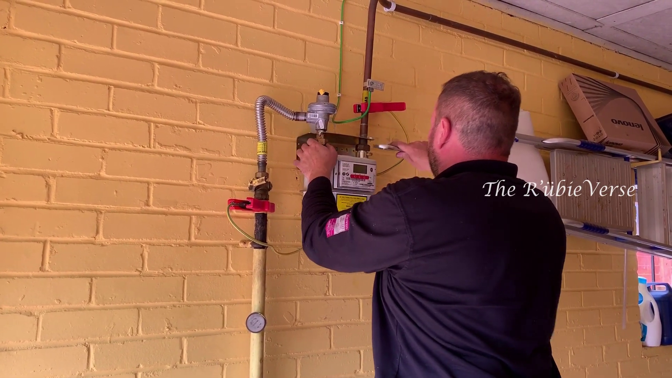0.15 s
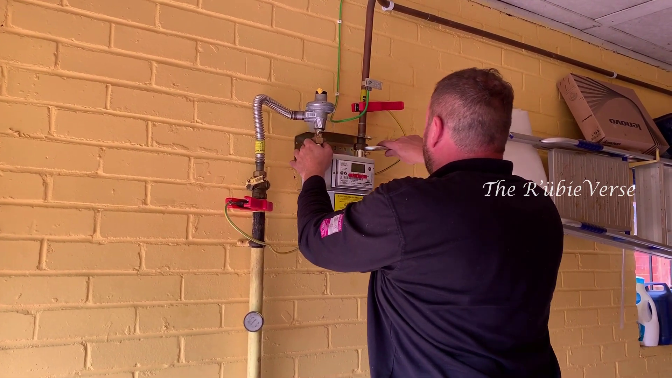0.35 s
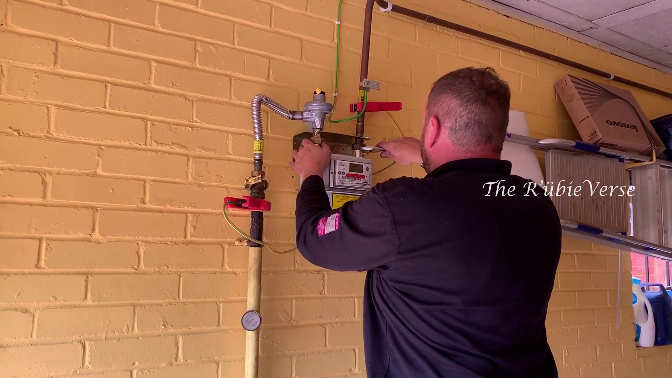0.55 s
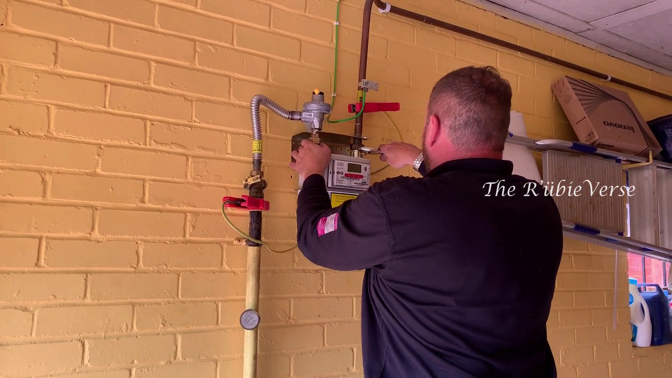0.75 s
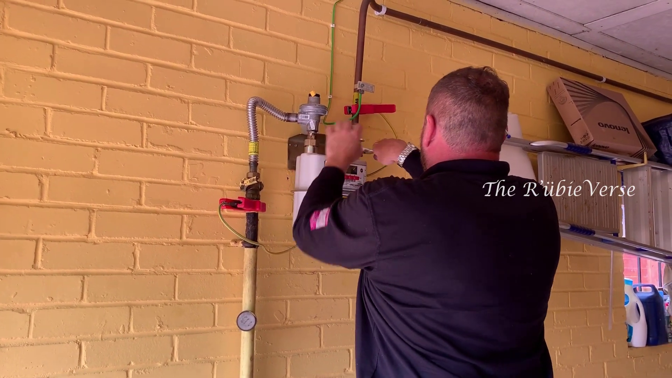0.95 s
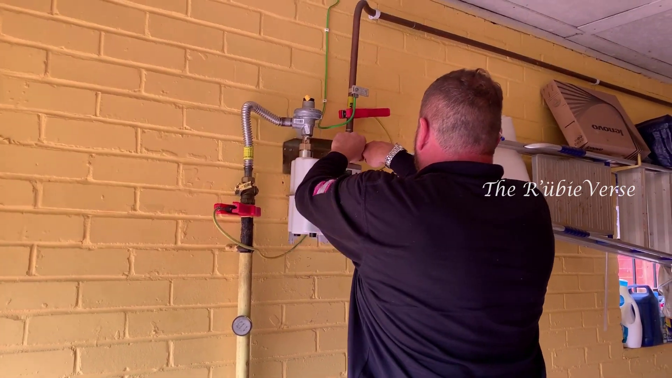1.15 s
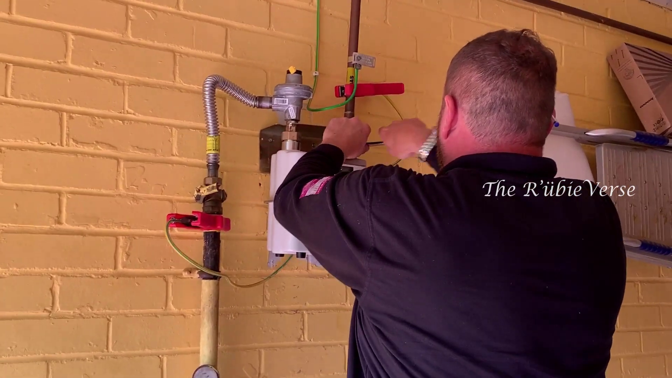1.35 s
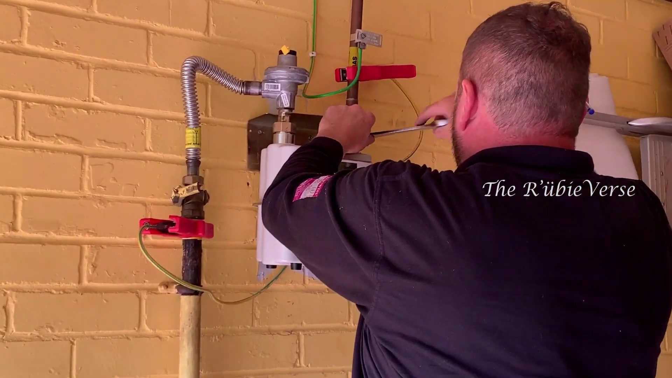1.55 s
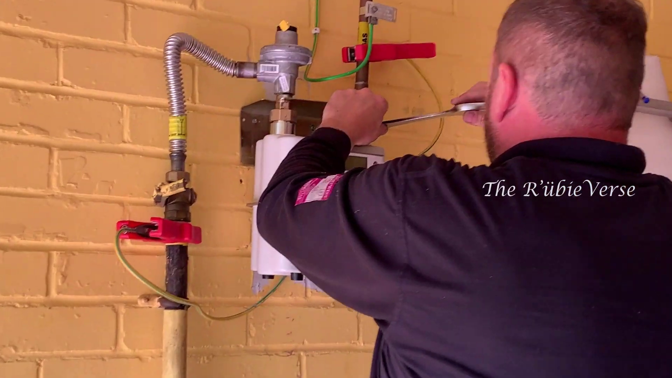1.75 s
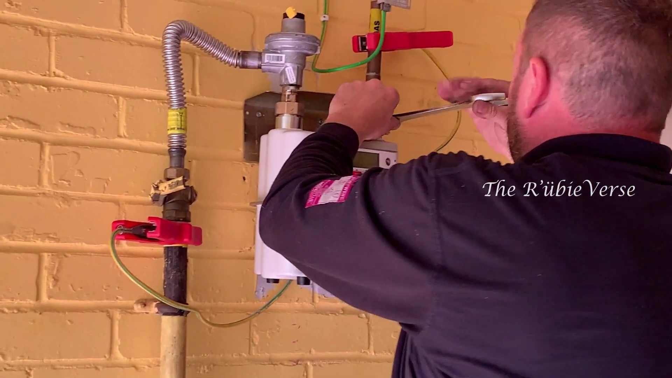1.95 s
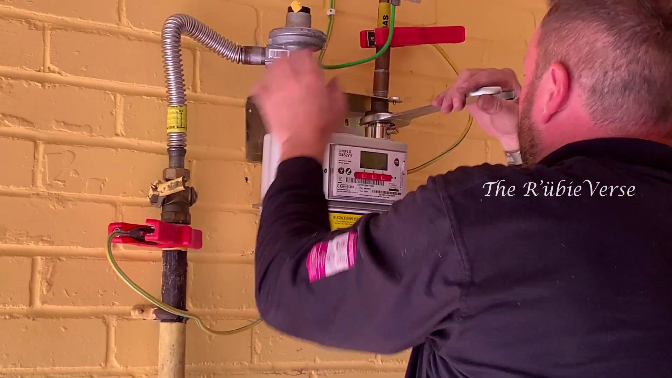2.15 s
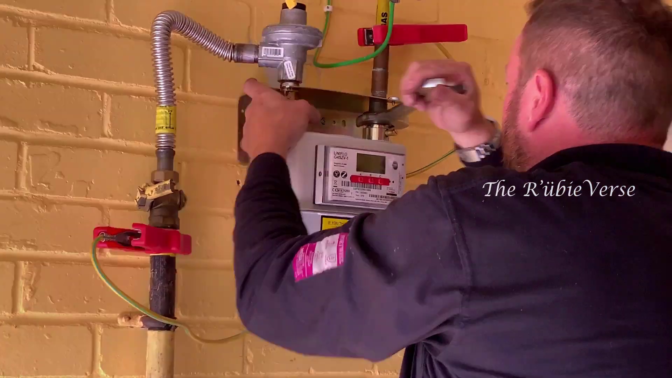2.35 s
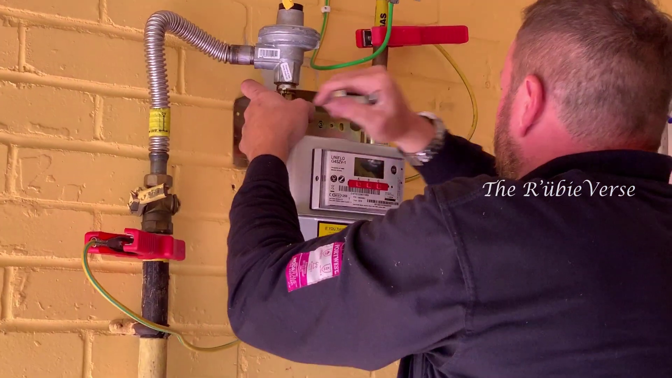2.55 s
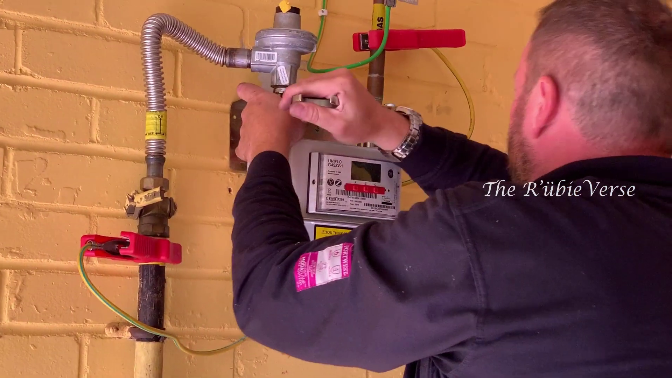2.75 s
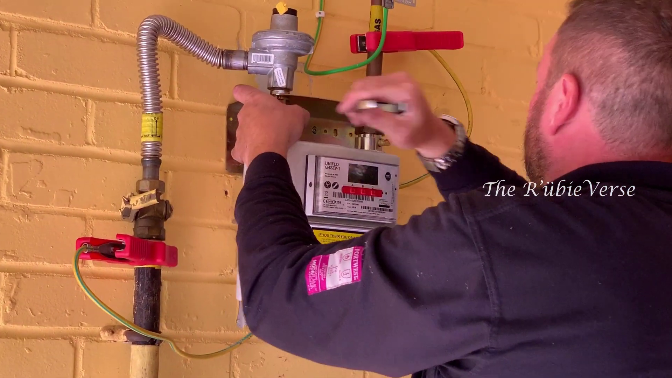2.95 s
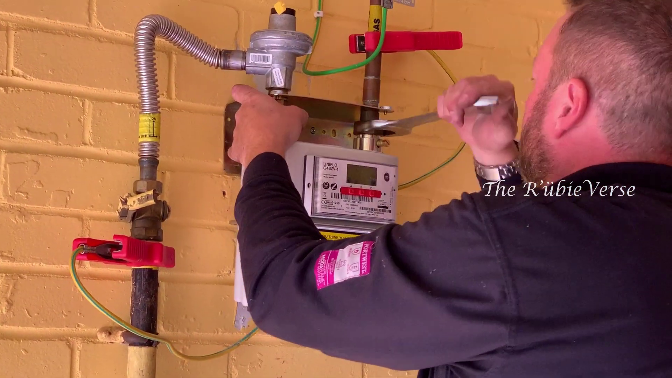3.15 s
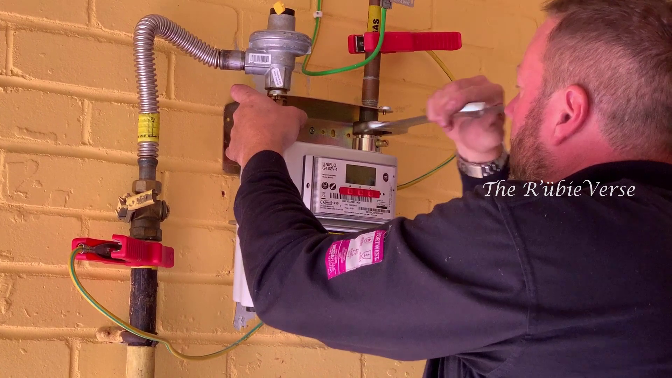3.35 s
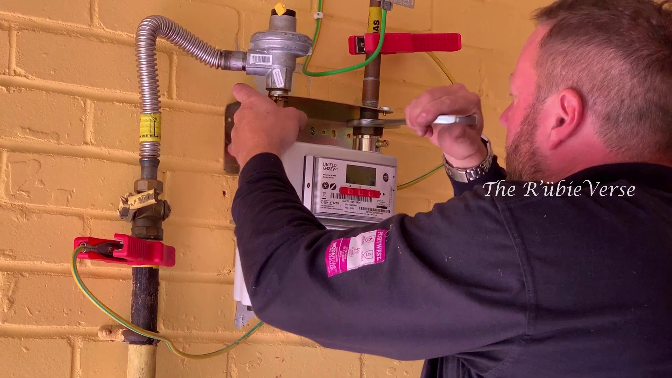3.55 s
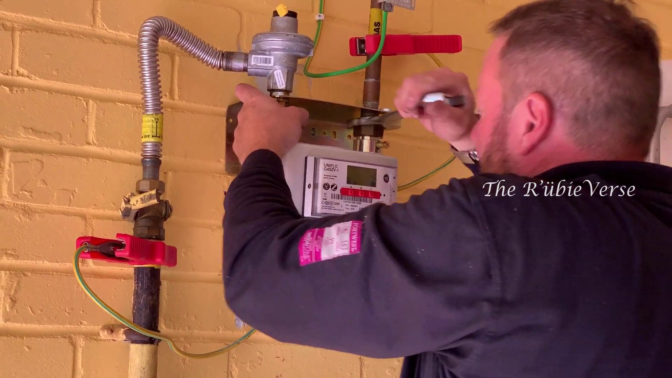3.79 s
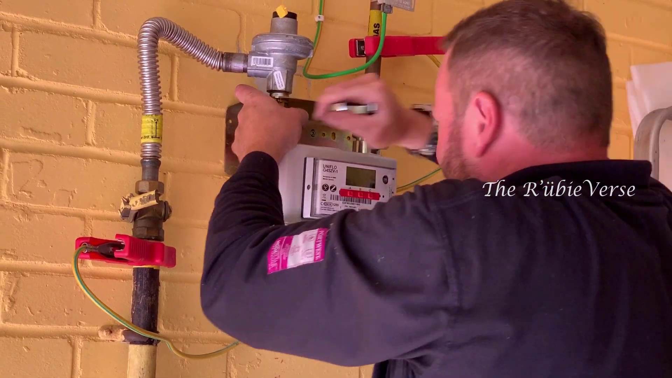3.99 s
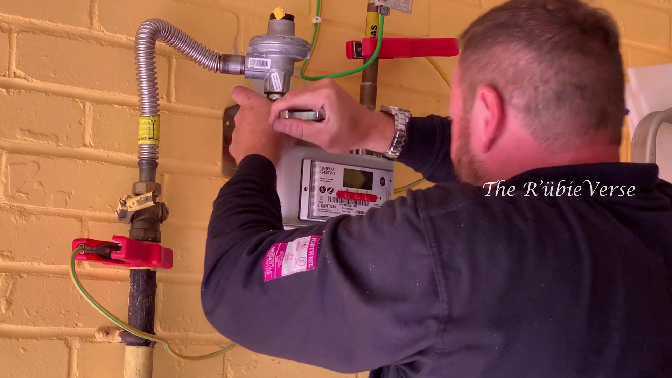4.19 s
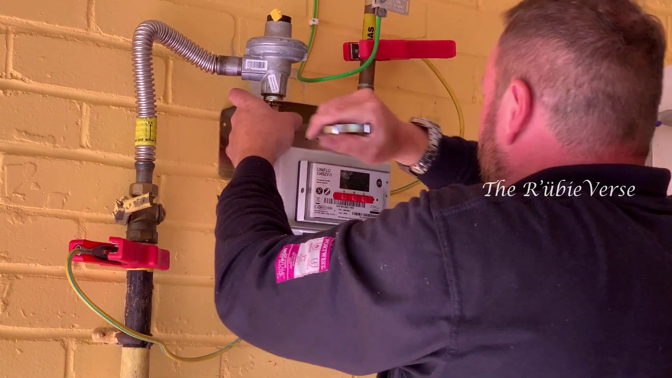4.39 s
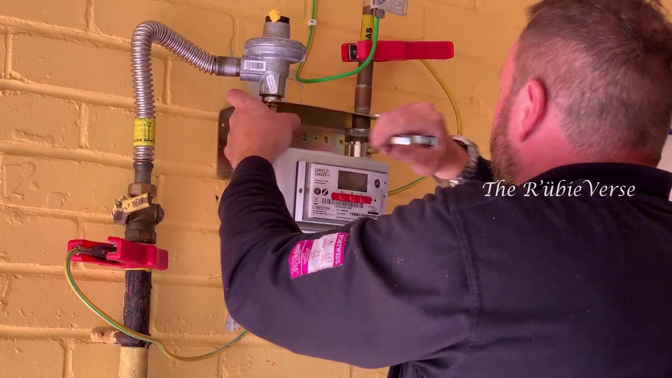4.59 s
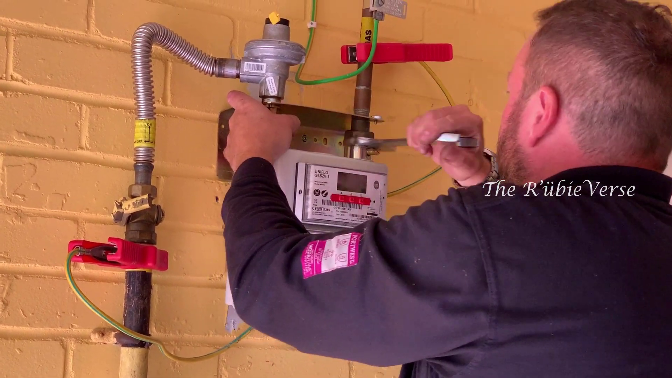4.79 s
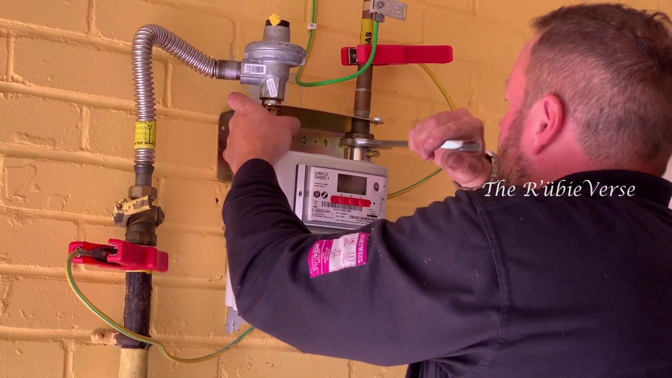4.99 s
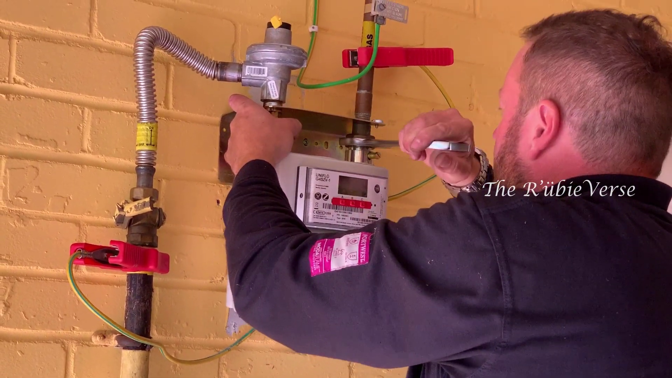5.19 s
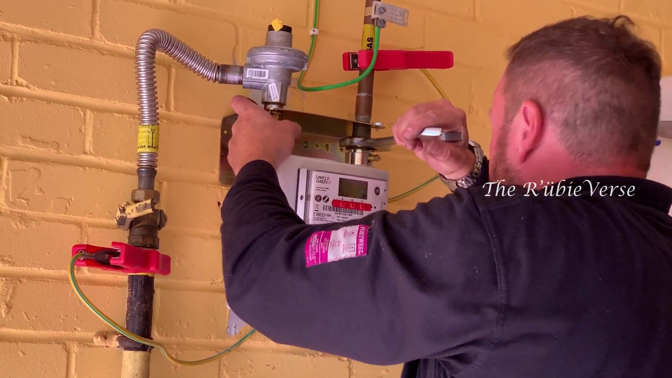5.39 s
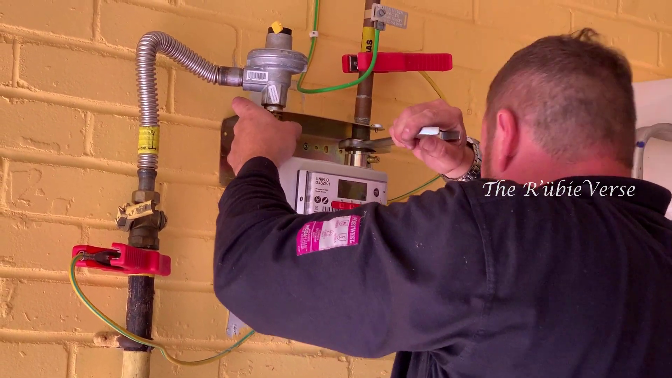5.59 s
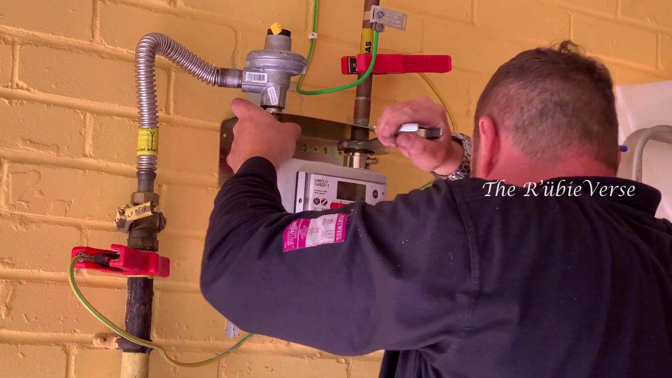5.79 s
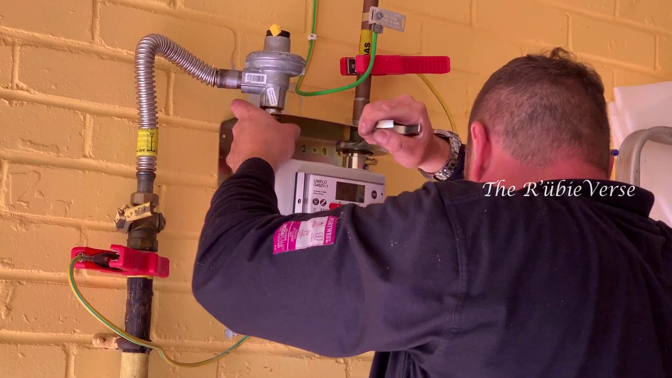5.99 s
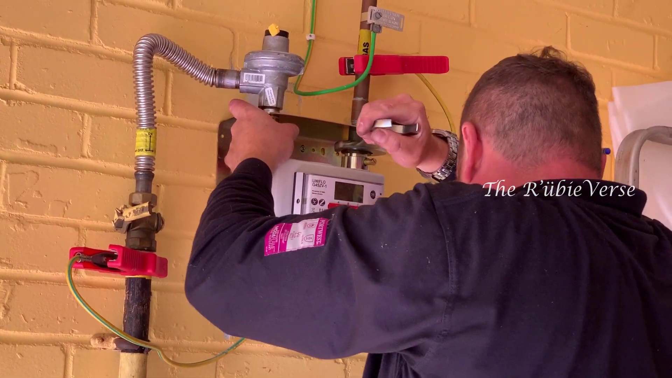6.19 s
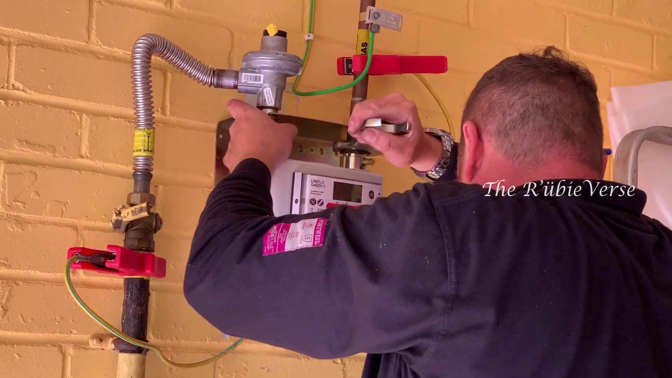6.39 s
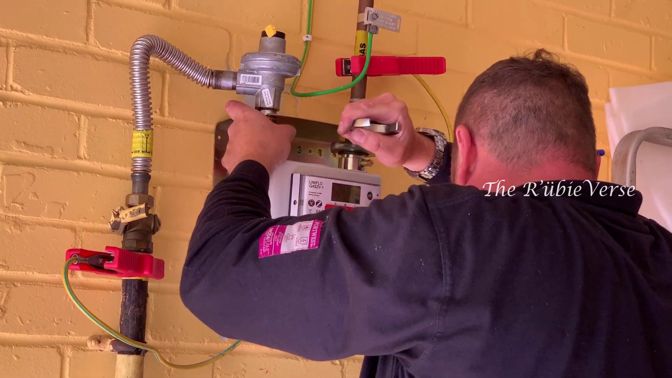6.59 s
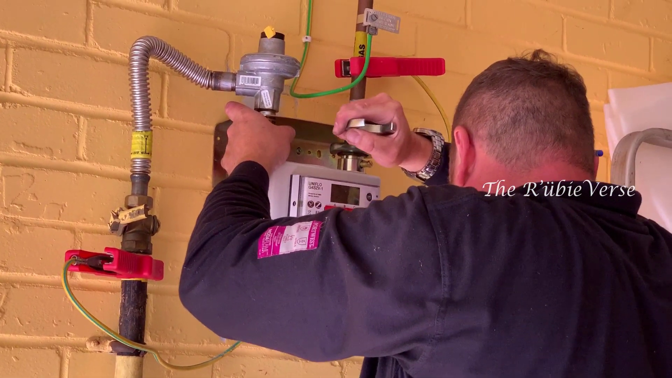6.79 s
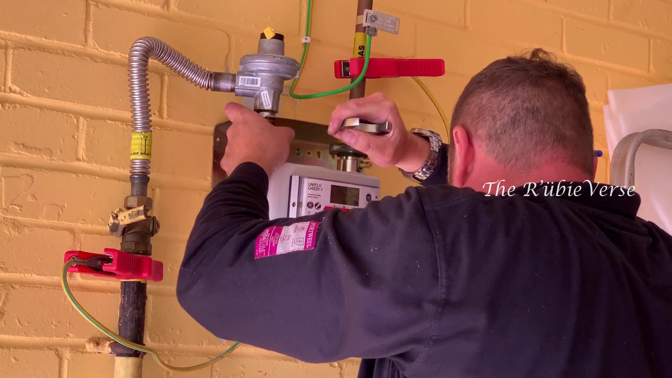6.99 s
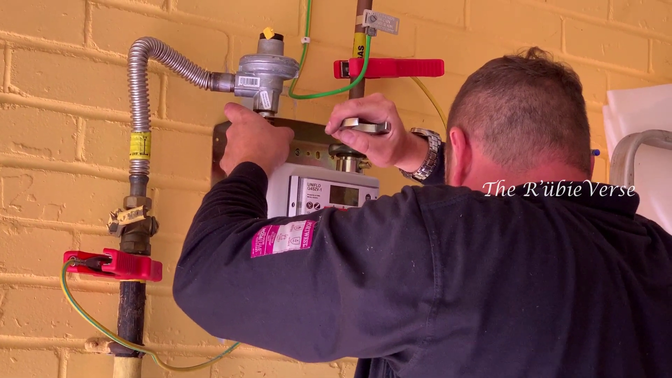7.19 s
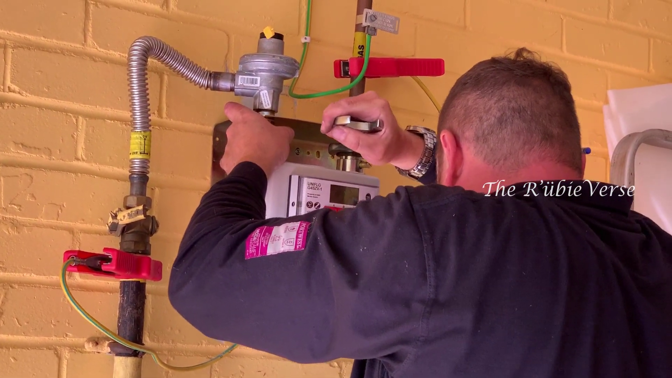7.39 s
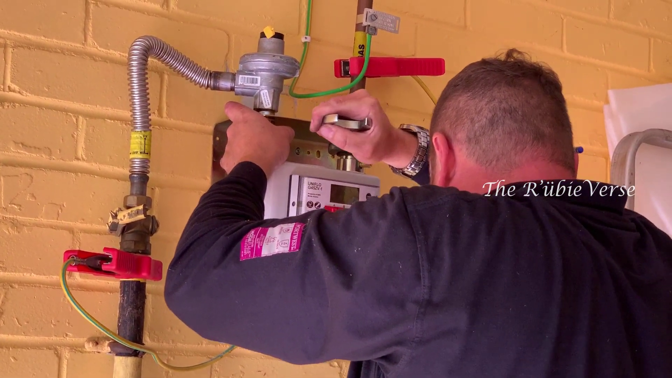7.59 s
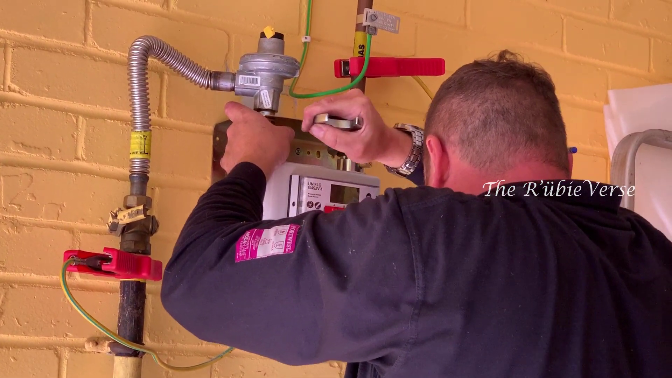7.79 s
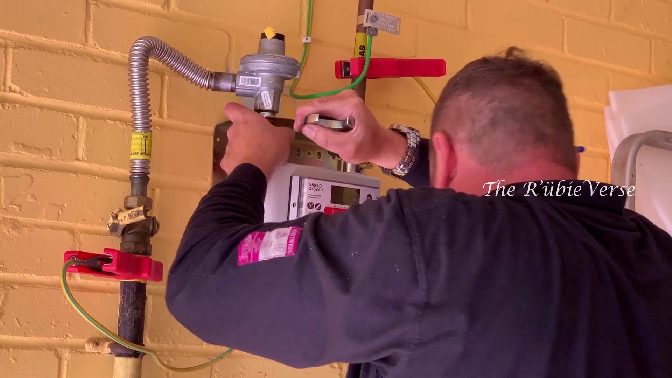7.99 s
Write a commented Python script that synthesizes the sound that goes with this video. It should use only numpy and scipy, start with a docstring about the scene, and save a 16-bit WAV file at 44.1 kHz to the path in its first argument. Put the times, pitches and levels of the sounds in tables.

```python
"""A steel spanner tightens the unions of a gas meter on a brick wall under a roof.
Its jaws scrape, squeak and knock on the nut, which jerks and hisses on its thread. Each contact
rings the meter case, bracket and pipes; the lifted spanner rings thinly. The covered yard echoes
every blow, over a faint outdoor rumble with thin whistles, hollow swishes and one far chirp."""
import sys
import numpy as np
from scipy import signal
from scipy.fft import rfft, irfft, next_fast_len
from scipy.io import wavfile
from scipy.ndimage import uniform_filter1d, map_coordinates

SR = 44100
rng = np.random.default_rng(int(sys.argv[2]) if len(sys.argv) > 2 else 0)


def write(x):
    x = np.atleast_2d(x).T
    wavfile.write(sys.argv[1], SR, np.round(np.clip(x, -1, 1) * 32767).astype(np.int16))


N = 354563

# modes of case, bracket and pipes: pitch_hz, level_db
METAL_MODES = [(103, -16.5), (134, -14.5), (243, -8.5), (361, -10.5), (469, -13), (537, -11.5), (605, -7),
               (673, -1), (748, 0), (808, -2), (840, -2), (909, -8.5), (1056, -5.5), (1293, -6),
               (1441, -5.5), (1583, -18), (1722, -11.5), (1940, -22.5), (2215, -14.5)]
# dense modes between them: freq_hz, density_db
DENSE_SPECTRUM = [(40, -19), (110, -9), (300, -7.5), (480, -7), (740, -3), (1000, -10), (1500, -12.5),
                  (1900, -19.5), (3200, -23.5), (5000, -28.5), (7000, -32.5), (9000, -27.5), (11500, -41.5),
                  (13500, -31), (15500, -47.5)]
# hand-damped resonances of nut and jaws: pitch_hz, boost_db
JAW_MODES = [(2360, 5), (2820, -0.5), (3090, 0), (3290, 3), (3850, 2.5), (4700, 5), (5640, 0.5),
             (6500, 5.5), (7480, -0.5), (7920, 0), (8280, 4), (9700, 5.5)]
# brightness of the direct crack over its echo: freq_hz, gain_db
CRACK_TILT = [(300, 0), (1500, 2), (3000, 4), (9000, 3)]
# yard decay: freq_hz, t60_s
YARD_DECAY = [(60, 0.4), (250, 0.44), (700, 0.38), (2000, 0.37), (5000, 0.31), (9000, 0.27), (13500, 0.088),
              (16000, 0.044)]
# stereo width: freq_hz, side_over_mid_db
STEREO_WIDTH = [(50, -16.5), (130, -16.5), (300, -10), (700, -3.5), (1400, -3), (2800, 0.5), (5500, -1),
                (12000, -1)]
# Tone columns, bass to treble: thud, middle, clank, chink. Snap: direct crack against ring.
# jaws pushed onto the nut: seat_s, length_s, level_db
SLIDES = [(1.459, 0.026, -29.5), (1.866, 0.034, -57.5), (2.928, 0.073, -46.5), (3.512, 0.091, -34.5),
          (4.393, 0.062, -38.5), (4.657, 0.035, -34), (4.886, 0.11, -41.5)]
# seated jaws rubbing: start_s, length_s, level_db, clank_db, chink_db, jaw_hz
RUBS = [(0.0, 0.012, -51.5, 18.5, 16, 1640), (0.087, 0.048, -68, 26, 48, 9600),
        (0.629, 0.022, -50.5, 10.5, 23, 8100), (0.819, 0.38, -54, 3, 11.5, 840),
        (0.93, 0.049, -47.5, 2, -11, 6250), (1.02, 0.14, -36, -3.5, -5.5, 2350),
        (1.219, 0.058, -35.5, 3.5, -13, 2000), (1.32, 0.16, -50.5, 3, 20.5, 13000),
        (1.606, 0.26, -65, -10, -6.5, 1100), (2.092, 0.037, -55, 5.5, 10, 1460),
        (3.275, 0.025, -38, -20, 1, 2220), (4.388, 0.019, -26.5, 17.5, 18, 1970),
        (4.387, 0.021, -32.5, 14, 17.5, 4830)]
# jaw squeaks, and pipe or spanner ringing on: start_s, length_s, level_db, pitch_hz, t60_s
METAL_TONES = [(0.0, 0.11, -66, 6830, 0.75), (0.0, 0.035, -67, 5060, 0.26), (0.02, 0.11, -70, 4260, 0.24),
               (0.11, 0.04, -72, 3275, 0.3), (0.919, 0.048, -57.5, 6160, 0.2),
               (0.923, 0.036, -59, 5180, 0.15), (0.918, 0.03, -56, 2860, 0.15),
               (1.337, 0.1, -59.5, 4700, 0.78), (1.361, 0.12, -55.5, 6780, 0.21),
               (2.92, 0.063, -67, 6600, 0.21), (0.406, 0.045, -46, 6600, 0.2),
               (3.546, 0.03, -26, 1443, 0.16), (4.397, 0.021, -22.5, 2225, 0.089),
               (4.561, 0.05, -53, 6550, 0.28), (4.89, 0.03, -42, 3300, 0.2)]
# spanner swinging free, tuned by the grip: start_s, level_db, pitch_ratio
LIFTS = [(0.0, -59, 0.96), (0.16, -65.5, 0.98), (2.296, -54, 0.93), (2.365, -51.5, 0.98),
         (2.941, -36, 0.98)]
# modes of its shaft: pitch_hz, level_db, t60_s
SPANNER_MODES = [(848, -8, 0.5), (1054, -1.5, 0.65), (1200, -10, 0.5), (1370, -16, 0.32),
                 (2040, -12.5, 0.28), (2500, -11, 0.26)]
# outdoor air: freq_hz, density_db
AIR_SPECTRUM = [(20, -8), (31, -6), (41, 6), (58, -7.5), (85, -2.5), (130, -18), (250, -16.5), (525, -23),
                (800, -24.5), (1500, -28), (2400, -40.5), (4000, -46.5), (10000, -48.5), (15000, -74)]
# its low rumble, pipework at rest: time_s, level_db
RUMBLE_LEVEL = [(0, -53.5), (0.8, -74), (1.1, -51.5), (2.4, -70.5), (3.5, -49), (4.3, -59), (6.4, -60.5),
                (7.3, -56), (8.04, -60)]
# its hush above the rumble: time_s, level_db
HUSH_LEVEL = [(0, -70.5), (0.3, -65.5), (0.8, -58), (1.7, -60), (2.6, -68.5), (5.6, -59.5), (6.2, -63.5),
              (7.3, -66), (8.04, -67.5)]
# far whistles, one list of points per glide: time_s, pitch_hz
WHISTLE_GLIDES = [
    [(0.11, 6560), (0.2, 6600), (0.28, 6400), (0.36, 5700)],
    [(1.83, 5600), (1.92, 7000), (2.03, 7130), (2.11, 6500), (2.21, 6500), (2.3, 6600)],
    [(7.97, 5780), (8.06, 6600)],
]
# spanner striking a union, with the case and jaw resonance each blow favours: start_s, level_db,
# thud_db, middle_db, clank_db, chink_db, snap_db, case_hz, case_db, jaw_hz, jaw_db
KNOCKS = [(0.361, -18, -10.5, 0, -2.5, -6, -1, 644, 6.5, 2510, 9.5),
          (0.383, -29.5, -4.5, 2.5, -1, 1.5, -1, 690, 8, 6840, 12.5),
          (0.438, -29, -18.5, 6.5, 9.5, 6, 0, 710, 3, 2400, 12.5),
          (0.457, -16, -10.5, -7.5, -4.5, 4.5, 4, 490, 7.5, 4670, 0.5),
          (0.465, -19.5, -9, 5, 7.5, -6.5, 2, 680, 2.5, 1380, 11.5),
          (0.486, -23, 1, -7.5, -11.5, -7.5, 6, 817, 2, 2820, 25.5),
          (1.143, -13.5, -9.5, 0, -1, -1, 1.5, 676, 1.5, 4300, 6),
          (1.166, -23.5, 2, 3, -1, -1.5, 5.5, 780, 0.5, 2400, 6),
          (1.444, -21.5, -9.5, 3, 0, -15, -6, 563, 10, 3240, 4.5),
          (1.865, -32, 3, -15, -21, -13, -0.5, 520, 9, 1710, 8),
          (2.907, -37, -15, 8, 3, -12, -0.5, 835, 1.5, 2350, 8.5),
          (2.937, -35, 6.5, -2, 1.5, 1, 7.5, 853, 4, 2360, 13.5),
          (2.945, -36, 5.5, -2, -4, -20.5, 6, 823, 10, 3220, 4.5),
          (3.09, -28.5, -10.5, 3, 7, 5, 1.5, 747, 3, 3290, 8.5),
          (3.133, -16.5, 3.5, -1, 3, 3.5, 1, 1079, 9.5, 3200, 11.5),
          (3.51, -13.5, -3, 2.5, 6, 6, 1.5, 881, 1.5, 6400, 9),
          (3.519, -16.5, -1.5, 2.5, -2, 2.5, 3, 1020, 7.5, 1670, 11),
          (3.57, -30, -8.5, 1, -10.5, -11.5, 8, 1440, 8, 1450, 12.5),
          (4.362, -39, -9, -4.5, 10, -11.5, 5, 829, 11.5, 2240, 8.5),
          (4.402, -36, -9, -5, 19.5, -1, -3, 820, 18.5, 2280, 17),
          (4.454, -47.5, -7.5, 1.5, -3.5, -6.5, 8.5, 842, 17.5, 2280, 8.5),
          (4.554, -15.5, -3, 2.5, -3, -8.5, -4, 578, 4, 3180, 19.5),
          (4.634, -21, -20, -3.5, 4, -6.5, -3, 761, -2, 3930, -3),
          (4.657, -16.5, -7.5, 0, 4, 1.5, 1.5, 772, 6, 2380, -4.5),
          (4.672, -29.5, -7, 4, 6.5, -1, 10, 560, 4, 4640, 12.5),
          (4.88, -16, -5.5, -1, -14, 2, 2, 781, 7, 3250, 19),
          (4.905, -28, -5.5, -7, -5, 2.5, 7, 750, 8.5, 1430, -4.5),
          (5.08, -17, -1, 0.5, -12.5, -8, 2.5, 585, 5, 3200, 20),
          (5.111, -38.5, 0, 2, 8, 1.5, 3, 1420, 16, 1590, 5)]
# nut giving way: start_s, level_db, thud_db, clank_db
JERKS = [(0.826, -46, 11.5, -11), (1.014, -31, 7, -1), (1.038, -30.5, 11.5, -14), (1.066, -42, -1, -13),
         (1.094, -37, 13, -20), (1.233, -25, -16, -5), (1.315, -38.5, 4, -2), (1.617, -39.5, 3.5, -15),
         (1.634, -54, 14, -16), (3.281, -27.5, 1, -10.5), (4.214, -43, 7.5, -16.5), (5.668, -37.5, -0.5, 2),
         (6.286, -43, 5.5, -9), (6.635, -43, -0.5, -8), (7.472, -41.5, 3, -5), (7.768, -53, 14, -26)]
# nut turning on its thread: start_s, length_s, level_db
TURNS = [(2.278, 0.52, -62), (3.757, 0.57, -67), (5.258, 0.35, -65)]
# thread hiss: freq_hz, density_db
THREAD_SPECTRUM = [(500, 11.5), (1000, 8.5), (2200, 4), (4000, 5.5), (6200, -5), (9000, -0.5), (11500, -16),
                   (15000, -42)]
# spanner tip touching the pipe: start_s, level_db, clank_db, chink_db
TICKS = [(2.283, -52.5, 6.5, 24), (2.751, -50, 15, 15.5)]
# background swishes: start_s, length_s, level_db, centre_hz
SWISHES = [(6.872, 0.25, -62.5, 517), (7.232, 0.27, -64, 480), (7.529, 0.33, -64.5, 470)]
# bird chirp, at even time steps: pitch_hz
CHIRP_HZ = [4650, 3920, 3800, 3150, 2950]


def amp(db):
    """Decibels to gain."""
    return 10 ** (np.asarray(db) / 20)


def unit(x):
    """Scale to rms 1."""
    return x / np.sqrt(np.mean(x ** 2) + 1e-20)


def along(points, hz):
    """Interpolate (freq_hz, value) points on a log axis."""
    points_hz, values = np.transpose(points)
    return np.interp(np.log(hz + 1), np.log(points_hz + 1), values)


def bell(hz, centre_hz, width):
    """Resonance curve of height 1; width is a share of centre_hz."""
    return 1 / (1 + ((hz / centre_hz - 1) / width) ** 2)


def filtered(x, response):
    """Apply the gain response(hz)."""
    n = x.shape[-1]
    size = next_fast_len(n + 8192)
    return irfft(rfft(x, size) * response(np.fft.rfftfreq(size, 1 / SR)), size)[..., :n]


def add(track, start_s, sound):
    """Mix in a stereo sound."""
    part = track[:, max(0, round(start_s * SR)):][:, :sound.shape[1]]
    part += sound[:, :part.shape[1]]


def stereo_noise(n, spectrum):
    """Coloured noise of rms 1: bass near mono, treble wide."""
    def response(hz):
        width = amp(along(STEREO_WIDTH, hz))
        return amp(along(spectrum, hz)) * np.array([np.ones_like(hz), width]) / np.hypot(1, width)
    mid, side = filtered(rng.standard_normal((2, n)), response)
    return unit(np.array([mid + side, mid - side]))


def drift(smooth_samples):
    """One second of smooth stereo wander, rms 1."""
    return unit(uniform_filter1d(rng.standard_normal((2, SR)), size=smooth_samples))


def yard_decay(x):
    """Fade each frequency at the yard's rate."""
    hz, t, bands = signal.stft(x, SR, nperseg=256)
    fade = amp(-60 * t / along(YARD_DECAY, hz)[:, None])
    return signal.istft(bands * fade, SR, nperseg=256)[1][:, :x.shape[1]]


def pulse(colour_db, size=2048):
    """Minimum-phase click with spectrum colour_db(hz)."""
    cepstrum = irfft(np.log(amp(colour_db(np.fft.rfftfreq(size, 1 / SR)))))
    cepstrum[1:size // 2] *= 2
    cepstrum[size // 2 + 1:] = 0
    return irfft(np.exp(rfft(cepstrum)))


def contact_ripple_db(hz, depth_db=3.5, spacing_hz=130):
    """A random contact point feeds some upper modes and starves others."""
    knots = rng.standard_normal(1024)
    ripple = np.interp(hz / spacing_hz, np.arange(len(knots)), knots)
    return depth_db * ripple * hz ** 2 / (hz ** 2 + 1200 ** 2)


def crack(panel_hz=760, panel_db=9, rattle=0.12, rattle_s=0.0046):
    """Direct sound: the case panel swings a few cycles while the contact rattles."""
    t = np.arange(SR // 64) / SR
    force = rattle * np.exp(-t / rattle_s) * rng.standard_normal(len(t))
    force[0] = 1
    panel = pulse(lambda f: along(DENSE_SPECTRUM, f) + panel_db * bell(f, panel_hz, 0.57)
                  + along(CRACK_TILT, f))
    sound = np.convolve(force, panel)
    return unit(np.array([sound, np.roll(sound, 3)]))  # left leads


def metal_ring(t60_at_700hz_s=0.4, scatter_db=3.5, detune=0.0051):
    """Case, bracket and pipes ring, detuned by the grip; high modes die first."""
    t = np.arange(SR // 2, dtype=np.float32) / SR
    hz, db = np.float32(METAL_MODES).T
    t60_s = t60_at_700hz_s * (700 / hz) ** 0.46
    level_draw, pitch_draw, phase_draw = rng.standard_normal((3, len(hz), 1)).astype(np.float32)
    fade = amp(db[:, None] + scatter_db * level_draw - 60 * t / t60_s[:, None])
    phase = 2 * np.pi * (hz[:, None] * (1 + detune * pitch_draw) * t + phase_draw)
    spread_rad = np.arctan(amp(along(STEREO_WIDTH, hz))) * rng.choice([-1, 1], len(hz))
    mid = np.cos(spread_rad) @ (fade * np.sin(phase))
    side = np.sin(spread_rad) @ (fade * np.cos(phase))
    return np.array([mid + side, mid - side])


def contact(tone_db, ring_db, snap_db, jaw_note_db=np.zeros_like,
            dense_db=-3, direct_db=-9, build_s=0.0005, walls_s=0.061):
    """One contact: direct crack, ringing modes and dense echo, coloured by tone_db(hz)."""
    ring = amp(ring_db) * metal_ring()
    t = np.arange(ring.shape[1]) / SR
    ring += amp(dense_db) * yard_decay(stereo_noise(len(t), DENSE_SPECTRUM))
    step_db = -3 * t ** 4 / (t ** 4 + walls_s ** 4)  # drops once the near walls have answered
    ring *= (1 - np.exp(-t / build_s)) * amp(step_db)
    colour_db = lambda f: tone_db(f) + sum(db * bell(f, hz, 0.031) for hz, db in JAW_MODES)
    # the hand damps the jaw: its note is weaker in the echo
    echo_filter = pulse(lambda f: colour_db(f) + 0.59 * jaw_note_db(f), size=4096)
    sound = signal.fftconvolve(ring, echo_filter[None], axes=1)
    direct = amp(direct_db + snap_db) * crack()
    direct_filter = pulse(lambda f: colour_db(f) + jaw_note_db(f), size=4096)
    add(sound, 0, signal.fftconvolve(direct, direct_filter[None], axes=1))
    return sound


def scrape(length_s, db, swell_db, clank_db, chink_db, jaw_hz, slips_per_s=520, case_hz=840):
    """Stick-slip: a run of tiny contacts rings the metal."""
    ramp = np.linspace(-0.5, 0.5, max(64, round(length_s * SR)))
    slipping = rng.random(SR)[:len(ramp)] < slips_per_s / SR
    force = rng.standard_normal(SR)[:len(ramp)]
    slips = slipping * np.sign(force) * amp(0.5 * np.abs(force))
    tilt = [(1000, 0), (2000, clank_db), (4000, clank_db), (8000, chink_db), (14000, chink_db - 7)]
    favoured_db = lambda f: 9 * bell(f, jaw_hz, 0.069) + 7 * bell(f, case_hz, 0.11)
    tone_db = lambda f: along(tilt, f) + favoured_db(f) + contact_ripple_db(f)
    ring = contact(tone_db, ring_db=-8, snap_db=-1)
    stroke = unit(slips) * amp(db + swell_db * ramp)
    return signal.fftconvolve(stroke[None], ring, axes=1) / np.linalg.norm(ring[0])


def jaw_scrapes():
    """Slides press harder until the jaws seat; rubs hold even pressure."""
    track = np.zeros((2, N))
    for seat_s, length_s, db in SLIDES:
        slide = scrape(length_s, db, swell_db=18.5, clank_db=-0.5, chink_db=-4, jaw_hz=2330)
        add(track, seat_s - length_s, slide)
    for start_s, length_s, db, clank_db, chink_db, jaw_hz in RUBS:
        add(track, start_s, scrape(length_s, db, 0, clank_db, chink_db, jaw_hz))
    return track


def metal_tones(waver_rad=1.9, rise_s=0.015):
    """Short metal tones: jaw squeaks, and pipe or spanner ringing on after a contact."""
    track, t = np.zeros((2, N)), np.arange(SR) / SR
    for start_s, length_s, db, hz, t60_s in METAL_TONES:
        fade = amp(db - 60 * np.maximum(t - length_s, 0) / t60_s) * (1 - np.exp(-t / rise_s))
        add(track, start_s, fade * np.sin(2 * np.pi * hz * t + waver_rad * drift(700)))
    return track


def spanner_ring(width_hz=20, attack_s=0.001):
    """The lifted shaft rings; hand and yard smear each mode into a narrow band."""
    track, t = np.zeros((2, N)), np.arange(SR // 2) / SR
    attack = 1 - np.exp(-t / attack_s)
    for start_s, db, pitch_ratio in LIFTS:
        for hz, mode_db, t60_s in SPANNER_MODES:
            band = lambda f: np.exp(-((f - pitch_ratio * hz) / width_hz) ** 2)
            mode = unit(filtered(rng.standard_normal((2, len(t))), band))
            add(track, start_s, amp(db + mode_db - 60 * t / t60_s) * attack * mode)
    return track


def outdoor_air(split_hz=140, shake_db=-31.5, rise_db_per_s=102.5, fall_db_per_s=34):
    """A drifting hush over a rumble that swells as knocks shake the pipework."""
    t = np.arange(N) / SR
    rumble_power = amp(np.interp(t, *np.transpose(RUMBLE_LEVEL))) ** 2
    for start_s, db, thud_db, *_ in KNOCKS:
        away_db = np.maximum(rise_db_per_s * (start_s - t), fall_db_per_s * (t - start_s))
        rumble_power += amp(db + thud_db + shake_db - away_db) ** 2
    lowpass = lambda hz: 1 / np.hypot(1, (hz / split_hz) ** 2)
    highpass = lambda hz: hz ** 2 / np.hypot(hz ** 2, split_hz ** 2)
    rumble = unit(filtered(stereo_noise(N, AIR_SPECTRUM), lowpass))
    hush = unit(filtered(stereo_noise(N, AIR_SPECTRUM), highpass))
    return np.sqrt(rumble_power) * rumble + amp(np.interp(t, *np.transpose(HUSH_LEVEL))) * hush


def whistles(db=-85, fade_s=0.034, flutter_db=3):
    """Thin, far tones glide and flutter."""
    track = np.zeros((2, N))
    for glide in WHISTLE_GLIDES:
        times_s, hz = np.transpose(glide)
        t = np.arange(times_s[0], times_s[-1], 1 / SR)
        pitch_hz = uniform_filter1d(np.interp(t, times_s, hz), size=2000)
        swell = np.clip(np.minimum(t - times_s[0], times_s[-1] - t) / fade_s, 0, 1)
        gain = amp(db + flutter_db * drift(1200)[:, :len(t)])
        add(track, times_s[0], gain * swell * np.sin(2 * np.pi * np.cumsum(pitch_hz) / SR))
    return track


def blow(db, thud_db, clank_db, chink_db, snap_db, ring_db=-6.5,
         favoured_db=np.zeros_like, jaw_note_db=np.zeros_like, hard_db=-18, hard_onset_s=0.00057):
    """One impact; lighter ones last longer, so start softly and lose top treble."""
    treble_db = chink_db - 2.5
    tilt = [(170, thud_db), (500, 0), (1400, 0), (3000, clank_db + 3), (4800, (clank_db + chink_db) / 2),
            (8000, treble_db), (14000, treble_db + 0.048 * (db - hard_db))]
    tone_db = lambda f: along(tilt, f) + favoured_db(f) + contact_ripple_db(f)
    sound = amp(db - 4) * contact(tone_db, ring_db, snap_db, jaw_note_db)
    t = np.arange(1, sound.shape[1] + 1) / SR
    onset_s = hard_onset_s * amp((hard_db - db) / 2)
    return sound * (1 - np.exp(-t / onset_s))


def jaw_knocks(lead_in_db=-21, lead_in_s=0.0043, rebound_s=0.018, rebound_db=-9, dull_db=-7):
    """After a faint lead-in, the jaw strikes the nut and rebounds once, softer and duller."""
    track = np.zeros((2, N))
    for start_s, db, thud_db, middle_db, clank_db, chink_db, snap_db, *resonances in KNOCKS:
        case_hz, case_db, jaw_hz, jaw_db = resonances
        favoured_db = lambda f: case_db * bell(f, case_hz, 0.073) + middle_db * bell(f, 1100, 0.25)
        strike = blow(db, thud_db, clank_db, chink_db, snap_db, favoured_db=favoured_db,
                      jaw_note_db=lambda f: jaw_db * bell(f, jaw_hz, 0.045))
        rebound = blow(db + rebound_db, thud_db, clank_db + dull_db, chink_db + dull_db, snap_db,
                       favoured_db=favoured_db)
        add(track, start_s - lead_in_s, amp(lead_in_db) * strike)
        add(track, start_s, strike)
        add(track, start_s + rebound_s * (1 + 0.35 * rng.uniform(-1, 1)), rebound)
    return track


def nut_jerks():
    """The nut gives in small, dull jerks that hardly ring the case."""
    track = np.zeros((2, N))
    for start_s, db, thud_db, clank_db in JERKS:
        add(track, start_s, blow(db, thud_db, clank_db, chink_db=-9.5, snap_db=-2.5, ring_db=-9))
    return track


def thread_hiss(rise_s=0.064, fall_s=0.19, uneven_db=2, catches_per_s=25):
    """The turning nut hisses unevenly through each swing."""
    track = np.zeros((2, N))
    for start_s, length_s, db in TURNS:
        t = np.arange(round(length_s * SR)) / SR
        swing = np.clip(np.minimum(t / rise_s, (length_s - t) / fall_s), 0, 1)
        grip_db = uneven_db * map_coordinates(rng.standard_normal(128), [t * catches_per_s])
        hiss = stereo_noise(SR, THREAD_SPECTRUM)[:, :len(t)]
        add(track, start_s, amp(db + grip_db) * swing * hiss)
    return track


def tip_ticks(thud_db=1.5):
    """The loose spanner's tip ticks brightly on the pipe."""
    track = np.zeros((2, N))
    for start_s, db, clank_db, chink_db in TICKS:
        add(track, start_s, blow(db, thud_db, clank_db, chink_db, snap_db=6, ring_db=-9))
    return track


def swishes(width=0.23):
    """Soft, hollow bands of noise swell and fade."""
    track = np.zeros((2, N))
    for start_s, length_s, db, centre_hz in SWISHES:
        arch = np.sin(np.linspace(0, np.pi, round(length_s * SR)))
        band = lambda hz: bell(hz, centre_hz, width) * np.minimum(hz / centre_hz, 1) ** 2
        hollow = unit(filtered(stereo_noise(SR, AIR_SPECTRUM), band))
        add(track, start_s, amp(db) * arch * hollow[:, :len(arch)])
    return track


def bird(start_s=6.92, length_s=0.049, db=-68):
    """One far, falling chirp, smeared by the yard."""
    track, progress = np.zeros((2, N)), np.linspace(0, 1, round(length_s * SR))
    pitch_hz = np.interp(progress, np.linspace(0, 1, len(CHIRP_HZ)), CHIRP_HZ)
    chirp = amp(db) * np.sin(np.pi * progress) * np.sin(2 * np.pi * np.cumsum(pitch_hz) / SR)
    tail = yard_decay(rng.standard_normal((2, SR // 2)))
    add(track, start_s, signal.fftconvolve(chirp[None], tail, axes=1) / np.linalg.norm(tail[0]))
    return track


def scene():
    """Work on the meter over the outdoor background."""
    impacts = jaw_knocks() + nut_jerks() + tip_ticks()
    work = impacts + jaw_scrapes() + metal_tones() + thread_hiss() + spanner_ring()
    return work + bird() + whistles() + swishes() + outdoor_air()


def record(dry, top_hz=15500):
    """Soft peak limit, then a steep low-pass."""
    rounded = dry / (1 + dry ** 4) ** (1 / 4)
    return filtered(rounded, lambda hz: 1 / (1 + (hz / top_hz) ** 120))


dry = scene()
out = record(dry)
write(out)
```